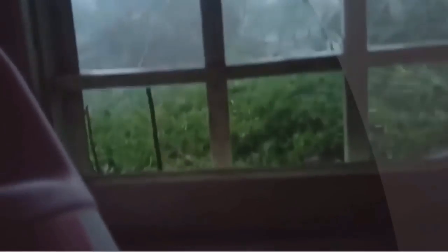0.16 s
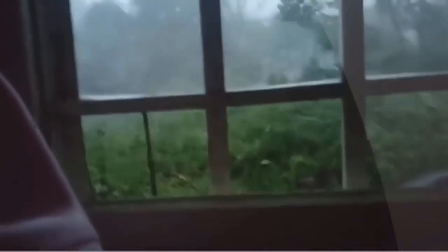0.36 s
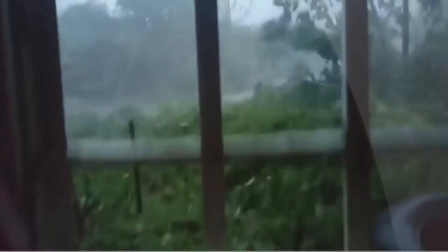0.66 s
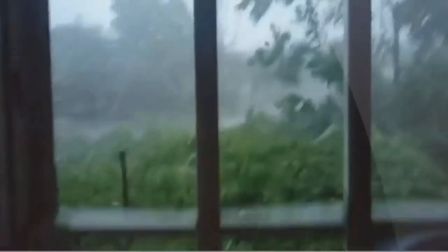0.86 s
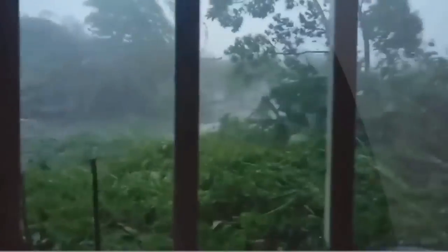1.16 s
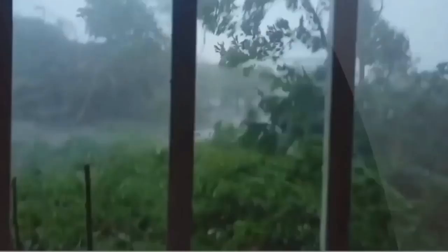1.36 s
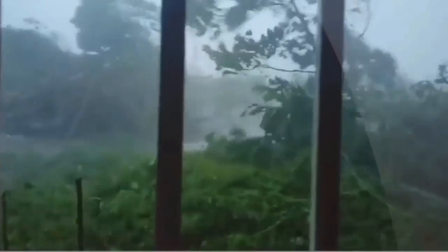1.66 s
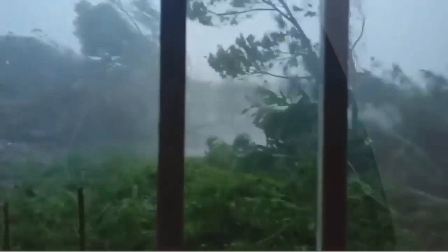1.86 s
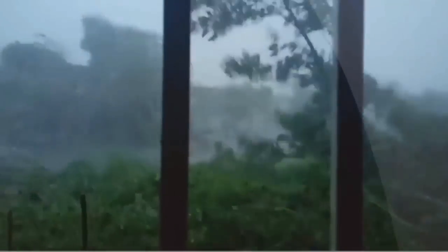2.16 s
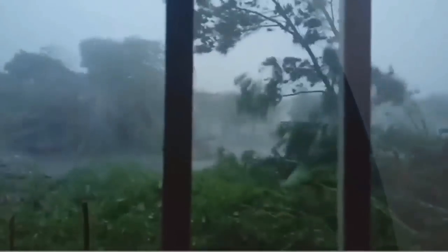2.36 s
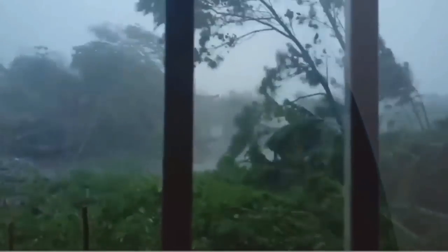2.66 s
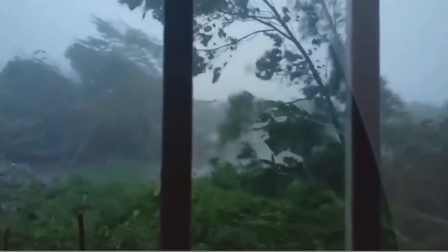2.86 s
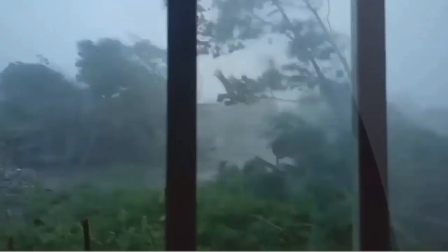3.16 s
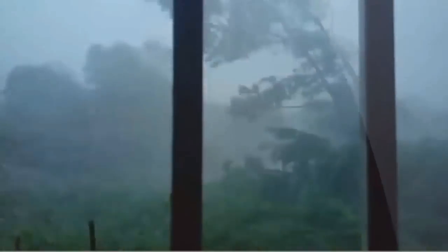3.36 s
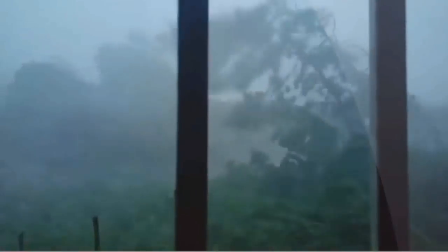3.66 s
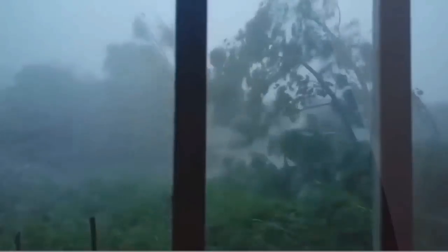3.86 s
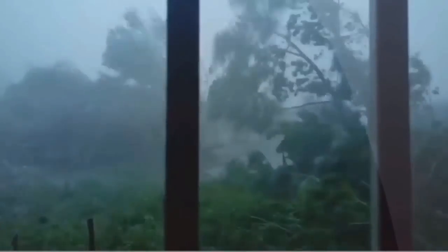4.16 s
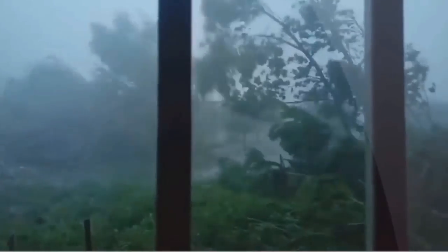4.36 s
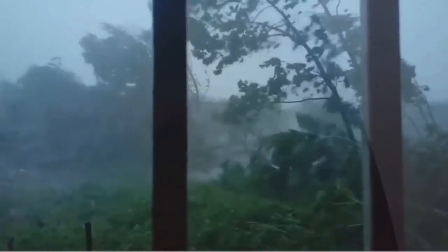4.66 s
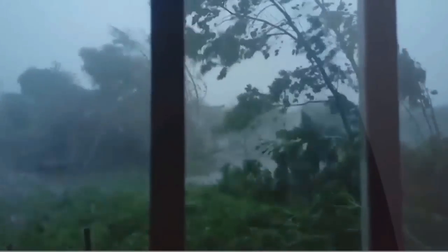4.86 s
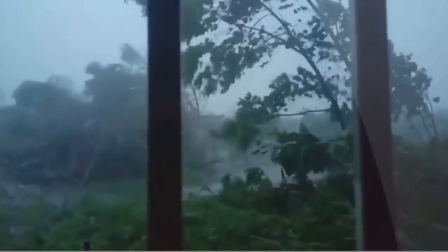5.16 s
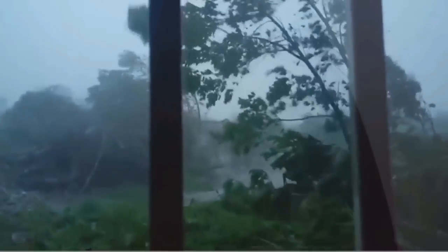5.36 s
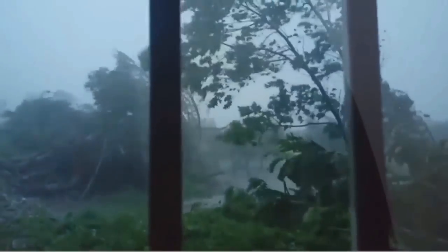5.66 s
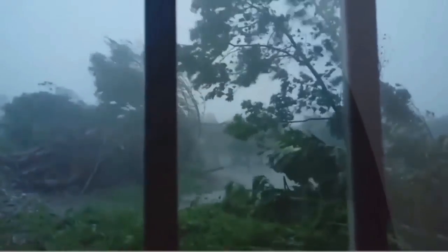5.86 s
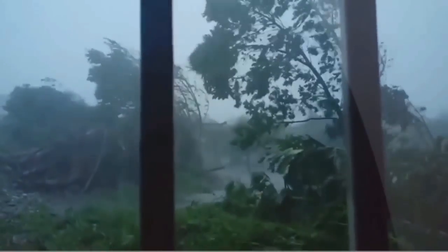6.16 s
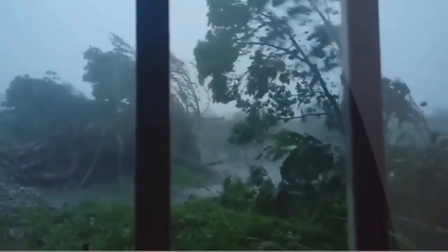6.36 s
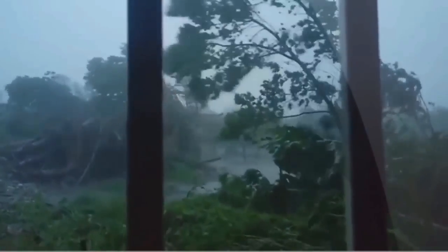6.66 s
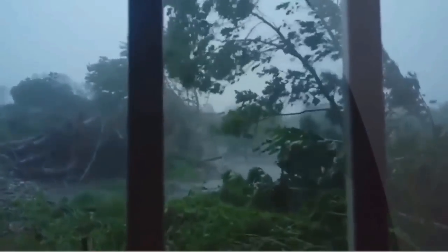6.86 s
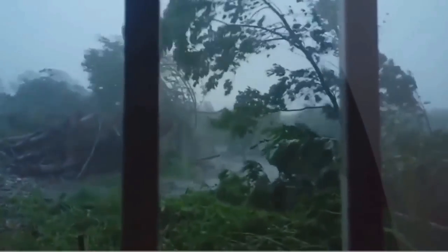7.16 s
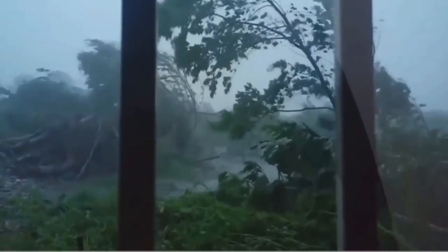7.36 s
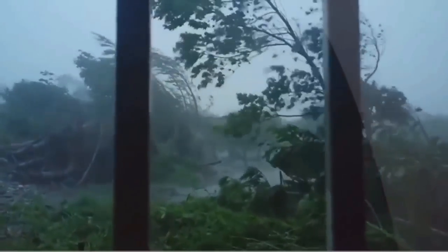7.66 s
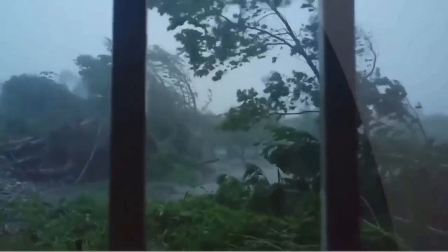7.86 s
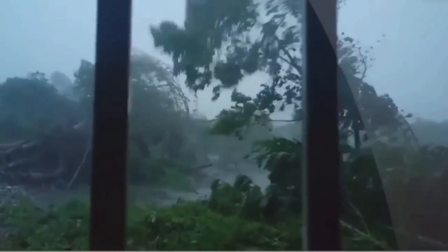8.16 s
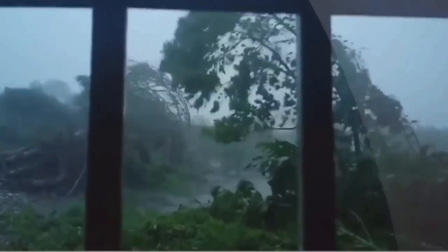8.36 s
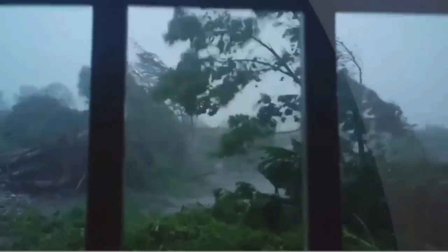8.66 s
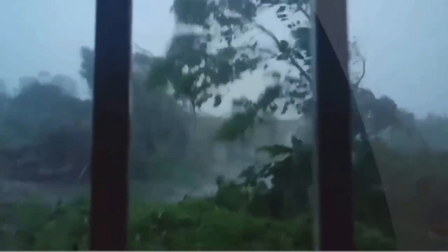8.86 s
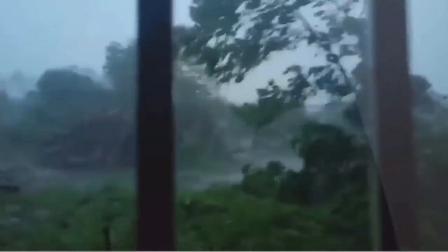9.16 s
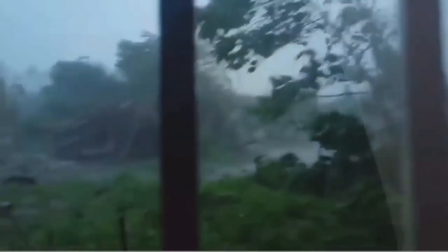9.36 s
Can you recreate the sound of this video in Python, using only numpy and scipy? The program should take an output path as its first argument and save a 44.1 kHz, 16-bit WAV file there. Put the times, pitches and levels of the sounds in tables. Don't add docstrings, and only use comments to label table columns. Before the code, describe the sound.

Inside a room with a barred window, a fierce storm roars without pause. Dense rain patters and hisses in surging sheets while wind rushes through trees and drones in the roof. Loose roofing slams at the start, again soon after, then in a harder cluster midway. A small handheld microphone gives a thin, nearly mono, slightly crushed sound that dips after the bangs.

```python
import sys
import numpy as np
from scipy import signal
from scipy.io import wavfile
from scipy.ndimage import uniform_filter1d

SR = 44100
rng = np.random.default_rng(int(sys.argv[2]) if len(sys.argv) > 2 else 0)


def magnitude_from_level(level_db):
    exponent = np.asarray(level_db, float) / 20
    return 10 ** exponent


def put_to_file(sound):
    columns = np.atleast_2d(sound).T
    safe = np.clip(columns, -1, 1)
    whole_steps = np.round(safe * 32767)
    wavfile.write(sys.argv[1], SR, whole_steps.astype(np.int16))


N = 418950
HOP = 1024


def in_time(rows, t):
    s, *columns = np.transpose(rows)
    return [np.interp(t, s, column) for column in columns]


def at_hz(points, hz):
    knots_hz, levels_db = np.transpose(points)
    return np.interp(np.log(hz), np.log(knots_hz), levels_db)


def rms_one(x):
    return x / np.sqrt(np.mean(x ** 2) + 1e-20)


def bumps(t, tops, heights_db, halves):
    return np.clip(1 - abs(t[:, None] - tops) / halves, 0, 1) @ heights_db


def lapped_basis():
    n, k = np.arange(2 * HOP)[:, None] + .5, np.arange(HOP) + .5
    window = signal.windows.kaiser_bessel_derived(2 * HOP, 4 * np.pi)[:, None]
    return np.sqrt(2 / HOP) * window * np.cos(np.pi / HOP * (n + HOP / 2) * k)


def to_tiles(x, lead=0):
    blocks = np.pad(x, (HOP + lead, 2 * HOP - N % HOP - lead)).reshape(-1, HOP)
    return np.hstack([blocks[:-1], blocks[1:]]) @ lapped_basis()


def from_tiles(tiles, lead=0):
    halves = tiles @ lapped_basis().T
    return (halves[:-1, HOP:] + halves[1:, :HOP]).ravel()[lead:lead + N]


def tile_axes():
    return np.arange(N // HOP + 2) * HOP / SR, (np.arange(HOP) + .5) * SR / (2 * HOP)


def patches(t, hz, frames, octaves):
    knots = np.arange(np.log2(100), np.log2(23000), octaves)
    field = uniform_filter1d(rng.standard_normal((len(t), len(knots))), frames, axis=0)
    place = np.interp(np.log2(hz), knots, np.arange(len(knots)))
    low = np.minimum(place.astype(int), len(knots) - 2)
    return rms_one(field[:, low] * (1 + low - place) + field[:, low + 1] * (place - low))


def drops(per_s, spread_db):
    sizes = magnitude_from_level(spread_db * np.minimum(rng.exponential(1, N), 5)) * rng.choice([-1, 1], N)
    return rms_one(sizes * (rng.random(N) < per_s / SR))


def ducking(t):
    # start in seconds, depth in dB, hold in seconds, quick loss of treble in dB.
    ducks = [
        (0.0, 3.5, .38, 6),
        (4.535, 5, .15, 5),
        (5.516, 4, .17, 11),
        (6.056, 2, .03, 1),
    ]
    sink_s, recover_db_per_s = .33, 11.5
    treble_attack_s, treble_hold_s, treble_release_s = .012, .09, .09
    treble_knots = np.cumsum([0, treble_attack_s, treble_hold_s, treble_release_s])
    slow = quick = 0
    for s, depth_db, hold, treble_db in ducks:
        sunk = s + sink_s
        rise = sunk + hold
        knots = [s - .001, sunk, rise, rise + depth_db / recover_db_per_s]
        slow = slow - np.interp(t, knots, [0, depth_db, depth_db, 0])
        quick = quick - np.interp(t - s, treble_knots, [0, treble_db, treble_db, 0])
    return slow, quick


def layer_db(t):
    # time in seconds, strength in dB about the mean.
    rain = [(0.0, -3), (0.55, 2.5), (1.12, 1.5), (1.27, 0), (1.39, 2.5), (1.57, -1), (1.8, 2.5), (2.1, -1),
            (2.5, -0.6), (2.9, 2), (3.85, 2), (4.03, 0.5), (4.4, 1), (7.2, -1.5), (7.57, 2), (8.42, -2.5),
            (8.78, 0.5), (9.34, -2)]
    # time in seconds, strength in dB about the mean.
    wind = [(0.0, 3), (0.8, 0), (1.4, 1), (1.85, -1), (2.65, 1.5), (2.88, 4), (3.3, -0.5), (3.86, -3),
            (4.25, -4.5), (4.7, 5), (5.1, 2), (5.9, -0.5), (6.4, 0.5), (7.2, 0.5), (7.9, -4), (8.3, 0.5),
            (8.8, 3.5), (9.5, 0)]
    # top in seconds, rise in dB, half length in seconds.
    surges = [(0.0, 5, 0.11), (0.58, 0.5, .12), (1.06, 3, 0.092), (1.253, 2.5, .12), (2.075, 3.5, 0.28),
              (2.93, 0.5, .1), (5.47, 3, 0.26), (6.72, 1.5, .2), (6.98, 2, .25), (8.148, 3, 0.55),
              (9.113, 3, .2), (9.42, 1, 0.072)]
    # top in seconds, rise of patter in dB, rise of hiss in dB, half length in seconds.
    bursts = [(0.0, -3, 1.5, 0.13), (0.36, -0.5, 3.5, .2), (1.928, 1, .5, .12), (2.295, 1.2, 1.5, .15),
              (4.72, -0.5, 2, .12), (5.398, 1, 0.4, 0.16), (5.564, 4, .5, 0.089), (5.745, 1.5, 2, 0.18),
              (6.7, 0.8, 1, 0.18), (8.906, 1.2, -1.5, 0.12), (9.43, .5, 3, 0.094)]
    layers = [
        (-30, 0.01, 1.0, 0.64, .6),
        (-21, 0.083, 0.12, 0.64, .2),
        (-18, 0.32, 0.037, 1.0, 0.097),
        (-22, 1.0, 0.01, 1.13, 0.78),
    ]
    controls = [np.ones(len(t)), *in_time(rain, t), *in_time(wind, t), *ducking(t)]
    tops, patter_db, hiss_db, halves = np.transpose(bursts)
    roof_db = bumps(t, *np.transpose(surges))
    moments = [0 * t, roof_db, bumps(t, tops, patter_db, halves), bumps(t, tops, hiss_db, halves)]
    return np.transpose(controls) @ np.transpose(layers) + np.transpose(moments)


def storm(patchy_db, sheets_db, drop_share):
    # frequency in Hz, density in dB per Hz.
    roar = [(120, -54), (200, -21), (289, -11), (401, -12), (512, -12.5), (587, -8), (761, -6), (1010, -1),
            (1330, -7.5), (1570, -6), (2230, -5.5), (2970, -9), (3410, -5.5), (4540, -14.5), (5200, -15.5),
            (6760, -47), (11400, -120)]
    # frequency in Hz, density in dB per Hz.
    hiss = [(4500, -10), (5400, -11.5), (6330, -3.5), (7150, 2), (8000, -6), (8550, -5.5), (9300, -10),
            (10050, -14), (10700, -11), (11350, -10), (11780, -17.5), (12200, -12), (13000, -21),
            (13950, -23.5)]
    layer_hz = [400, 1000, 2500, 7500]
    # frequency in Hz, side over mid in dB.
    apart = [(200, -35), (3000, -33), (3900, -20.5), (5000, -22.5), (7000, -21), (8000, -21), (9000, -10),
             (10000, -13), (11300, -7.5), (13000, -12)]
    # frequency in Hz, left over right in dB.
    lean = [(5000, 0), (7300, 1), (10000, -0.3), (13300, -4.5)]
    t, hz = tile_axes()
    roar_db = at_hz(roar, hz) - at_hz(roar, 4800)
    hiss_db = at_hz(hiss, hz) - at_hz(hiss, 4800)
    colour = np.where(hz < 4800, roar_db, hiss_db)

    share = np.clip(drop_share, 0, 1) * np.clip(hz / 8000, 0, 1)
    air = rng.standard_normal((2, len(t), HOP))
    impacts = to_tiles(drops(2500, spread_db=1.5))
    mid = np.sqrt(1 - share) * air[0] + np.sqrt(share) * impacts

    own_db = []
    for low, high in [(200, 700), (700, 1400), (1400, 4500), (5500, 13000)]:
        inside = (hz > low) & (hz < high)
        own_db.append(10 * np.log10(np.sum(magnitude_from_level(2 * colour[inside])) / HOP))
    weights = np.array([np.interp(np.log(hz), np.log(layer_hz), np.arange(4) == j) for j in range(4)])
    swell = (layer_db(t) - own_db) @ weights

    flutter = rms_one(uniform_filter1d(rng.standard_normal(len(t)), size=4))
    sheets = flutter[:, None] * weights[3]
    howls = 1.3 * patches(t, hz, frames=4, octaves=1 / 30)
    flicker = patchy_db * patches(t, hz, frames=3, octaves=1 / 4)
    gain = magnitude_from_level(colour + swell + howls + flicker + sheets_db * sheets)
    side = air[1] * magnitude_from_level(at_hz(apart, hz)) + mid * np.tanh(at_hz(lean, hz) / 17.4)
    return from_tiles(gain * mid), from_tiles(gain * side)


def resonate(x, hz, width_hz):
    r = np.exp(-np.pi * width_hz / SR)
    poles = [1, -2 * r * np.cos(2 * np.pi * hz / SR), r * r]
    return signal.lfilter([(1 - r * r) / 2, 0, (r * r - 1) / 2], poles, x)


def slams():
    # start in seconds, level in dB, ring t60 in seconds, tilt in dB per octave, upper mode in dB.
    impacts = [
        (0.002, -15, 0.68, -4.5, 0),
        (.338, -15, .45, -3, 8.5),
        (.50, -18.5, .25, -6.5, -5),
        (1.079, -18.5, 0.19, -5, -6),
        (4.54, -15.5, 0.47, -0.5, 9),
        (4.70, -23.5, 0.74, -11, -4),
        (5.517, -14, 0.63, -0.5, 0),
        (6.06, -22, 0.3, -13.5, -5),
        (6.215, -15, 0.52, -7.5, -4),
    ]
    # frequency in Hz, width in Hz, level in dB.
    modes = [(600, 200, -8), (863, 120, 3), (1057, 150, 2), (1720, 110, -3.5), (2290, 300, -9.5),
             (3500, 520, -11)]
    upper = 3
    size = SR // 2
    t = np.arange(size) / SR
    out = np.zeros(N)
    for s, level_db, t60, tilt_db, upper_db in impacts:
        at = round(s * SR)
        shake = rng.standard_normal(size) * np.minimum(t / .004, 1) * magnitude_from_level(-60 * t / t60)
        body = np.zeros(size)
        for k, (hz, width_hz, db) in enumerate(modes):
            mode_db = db + tilt_db * np.log2(hz / 1000) + upper_db * (k == upper)
            body += magnitude_from_level(mode_db) * resonate(shake, hz, width_hz) * (-1) ** k
        out[at:at + size] += magnitude_from_level(level_db + 16) * body
    return out


def buffets():
    # start in seconds, length in seconds, level in dB.
    gusts = [
        (1.55, .02, -52),
        (2.79, .15, -42.5),
        (3.018, .06, -43.5),
    ]
    # start in seconds, peak in dB, frequency in Hz, t60 in seconds.
    knocks = [
        (2.982, -19, 125, .08),
    ]
    rise_db_per_s, fall_db_per_s = 1200, 1000
    band = signal.butter(4, [65, 170], "band", fs=SR, output="sos")
    low = rms_one(signal.sosfilt(band, rng.standard_normal(N)))
    clock = np.arange(N) / SR
    envelope = np.zeros(N)
    for s, length, db in gusts:
        before, after = np.maximum(s - clock, 0), np.maximum(clock - s - length, 0)
        envelope += magnitude_from_level(db - rise_db_per_s * before - fall_db_per_s * after)
    out = low * envelope
    for s, peak_db, hz, t60 in knocks:
        t = np.maximum(clock - s, 0)
        out += magnitude_from_level(peak_db - 60 * t / t60) * np.sin(2 * np.pi * hz * t) * np.minimum(t / 0.0037, 1)
    return out


def scene():
    mid, side = storm(patchy_db=0.68, sheets_db=-0.35, drop_share=.2)
    mid = 1.204 * np.tanh((mid + slams()) / 1.17)
    bass_cut = signal.butter(10, 185, "high", fs=SR, output="sos")
    mid = signal.sosfilt(bass_cut, mid) + buffets()
    return np.array([mid + side, mid - side])


def rounded(lines, step):
    return np.sign(lines) * step * np.floor(np.abs(lines) / step + .4)


def hearing_bands(tiles):
    band_place = np.round(28 * np.log(1 + tile_axes()[1] / 2400))
    band = np.unique(band_place, return_inverse=True)[1]
    member = band[:, None] == np.arange(band.max() + 1)
    power = tiles ** 2 @ member / member.sum(axis=0)
    return band, np.sqrt(power + 1e-12)[:, band]


def coarse_mid(mid, clear_db, follow, frame_db, band_db):
    # frequency in Hz, level in dB.
    faintest = [(170, -30.5), (260, -36), (5200, -35), (8600, -30), (10000, -22.5), (11300, -24.5),
                (12300, -22.5), (13100, -23), (13700, -19.5), (14000, -8)]
    t, hz = tile_axes()
    tiles = to_tiles(mid, lead=400)
    band, level = hearing_bands(tiles)
    loud_db = 10 * np.log10(np.mean(tiles ** 2, axis=1) + 1e-9) + 15
    luck = rng.standard_normal((2, len(t), band.max() + 1))
    wander, hunger = uniform_filter1d(luck, size=3, axis=1) * np.sqrt(3)
    band_wander_db = band_db * wander[:, band]
    frame_shift_db = (follow * loud_db + frame_db * wander[:, 0])[:, None]
    floor = magnitude_from_level(at_hz(faintest, hz) + frame_shift_db + band_wander_db)
    step = np.maximum(level * magnitude_from_level(-clear_db + band_wander_db), floor)
    starved = (hunger[:, band] > 2.2) & (hz > 1200) & (hz < 3200)
    return from_tiles(rounded(tiles, step) * ~starved, lead=400)


def fine_pair(mid, side, wander_db, split_above, split_db):
    # frequency in Hz, mid step in dB, side step in dB.
    steps = [(250, -40, -36), (500, -36, -34), (1000, -27, -25), (1700, -25.5, -26), (2700, -28, -26),
             (3700, -30, -26), (5000, -31, -27), (7000, -29, -25), (9000, -33, -27.5), (11500, -35, -31),
             (13000, -33, -29)]
    lead = 78
    t, hz = tile_axes()
    mid, side = to_tiles(mid, lead), to_tiles(side, lead)
    band, level = hearing_bands(mid)
    luck = rng.standard_normal((len(t), band.max() + 2))
    frame_luck = luck[:, -1] + .6 * np.roll(luck[:, -1], 1)
    split = (frame_luck > split_above)[:, None]
    slip_size = np.minimum(magnitude_from_level(-14) * level, magnitude_from_level(split_db))
    slips = split * (hz > 170) * (hz < 8500) * slip_size * rng.standard_normal(mid.shape)
    knots_hz, mid_knots_db, side_knots_db = np.transpose(steps)
    mid_db = np.interp(np.log(hz), np.log(knots_hz), mid_knots_db)
    side_db = np.interp(np.log(hz), np.log(knots_hz), side_knots_db)
    shift_db = wander_db * luck[:, band]
    mid = from_tiles(rounded(mid, magnitude_from_level(mid_db + shift_db)), lead)
    side = from_tiles(rounded(side + slips, magnitude_from_level(side_db + shift_db - 2 * split)), lead)
    return np.array([mid + side, mid - side])


def roll_off(x):
    return signal.sosfilt(signal.butter(12, 13910, fs=SR, output="sos"), x)


def record(dry):
    left, right = dry
    mid = coarse_mid((left + right) / 2, clear_db=0.5, follow=0.53, frame_db=1.5, band_db=1.5)
    pair = fine_pair(mid, (left - right) / 2, wander_db=1.5, split_above=1.0, split_db=-31.0)
    return roll_off(pair)


dry = scene()
out = record(dry)
put_to_file(out)
```